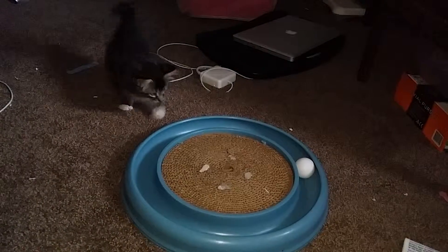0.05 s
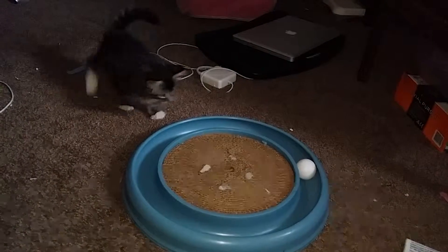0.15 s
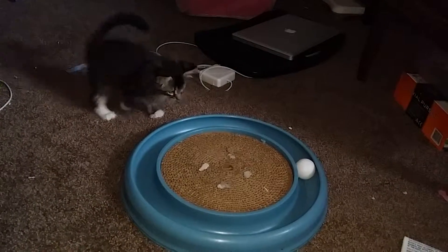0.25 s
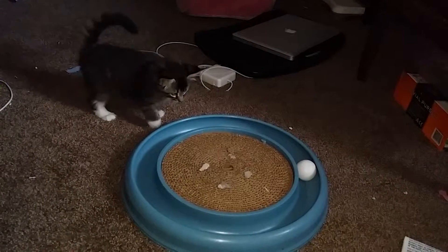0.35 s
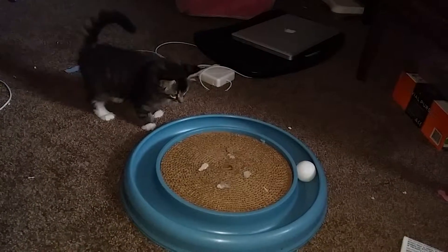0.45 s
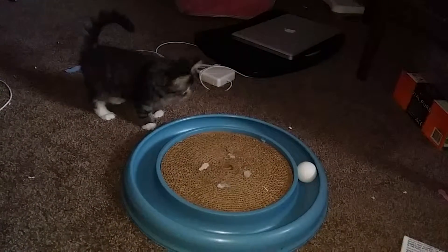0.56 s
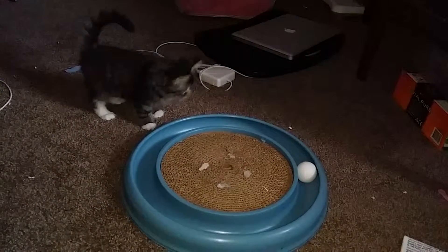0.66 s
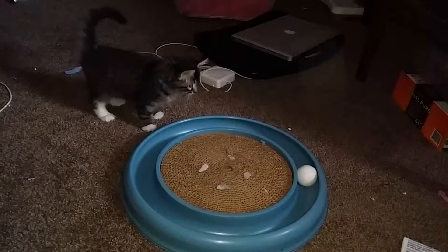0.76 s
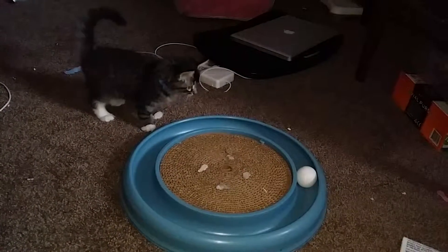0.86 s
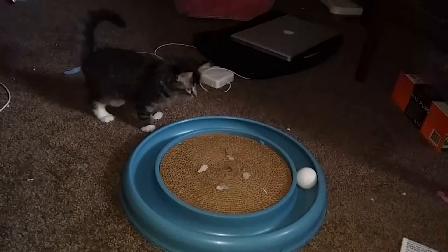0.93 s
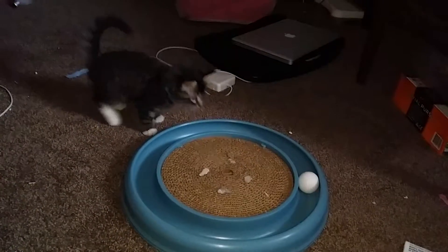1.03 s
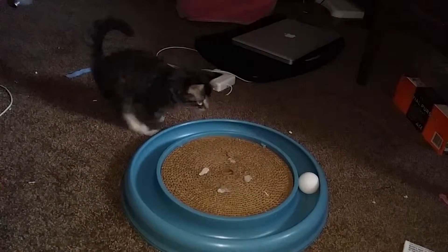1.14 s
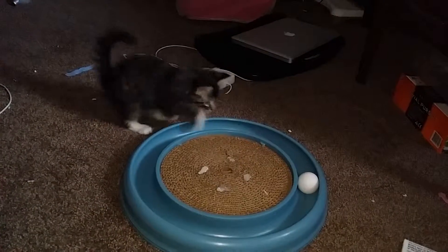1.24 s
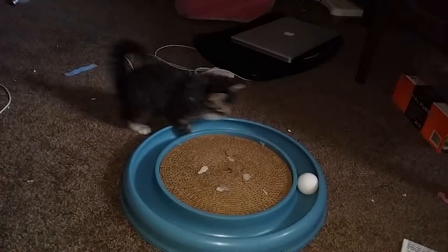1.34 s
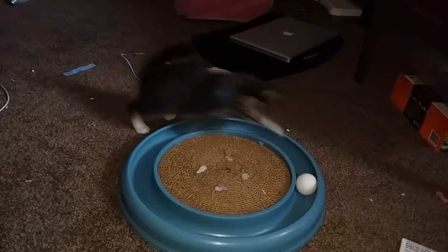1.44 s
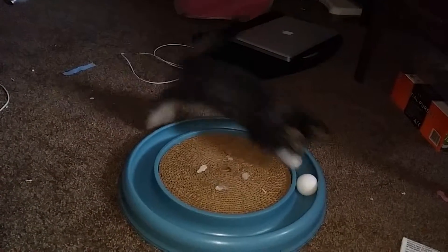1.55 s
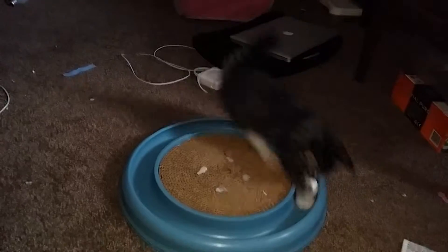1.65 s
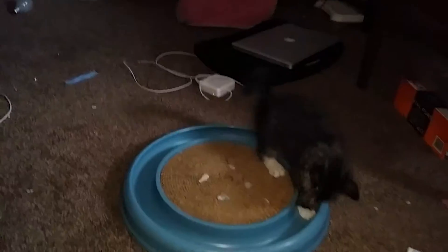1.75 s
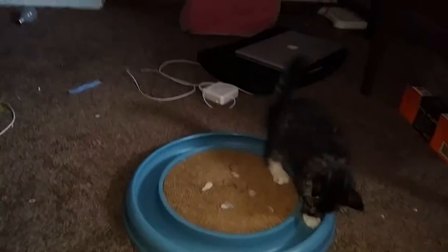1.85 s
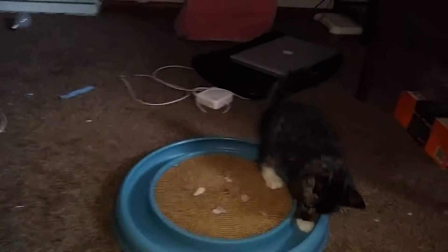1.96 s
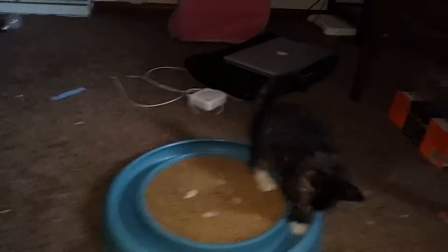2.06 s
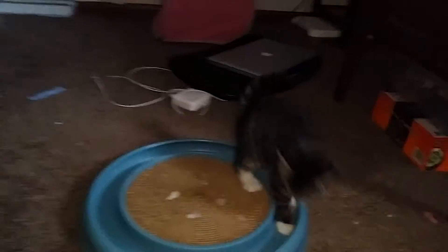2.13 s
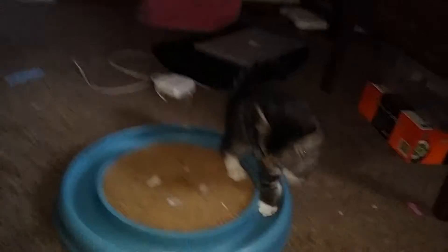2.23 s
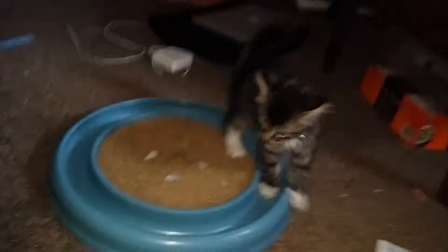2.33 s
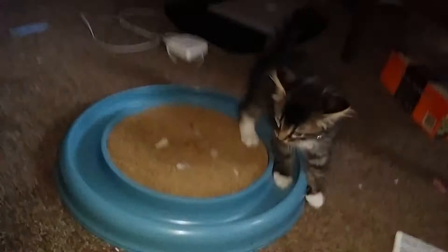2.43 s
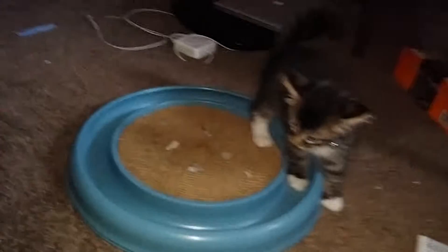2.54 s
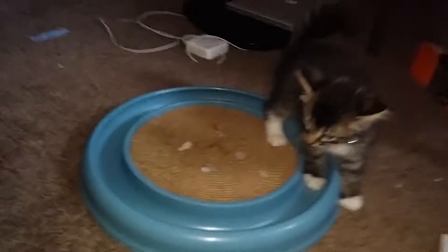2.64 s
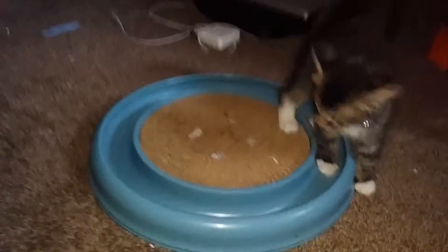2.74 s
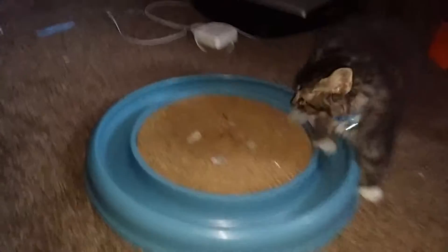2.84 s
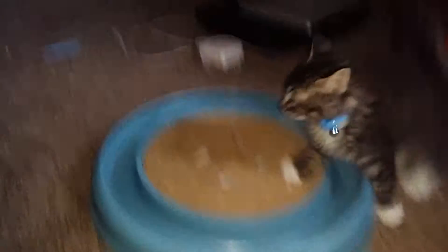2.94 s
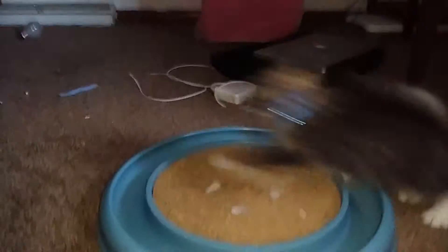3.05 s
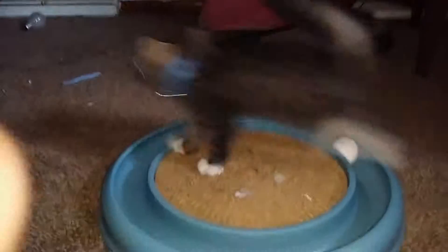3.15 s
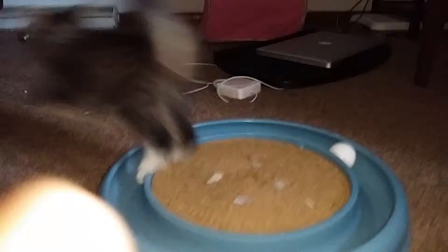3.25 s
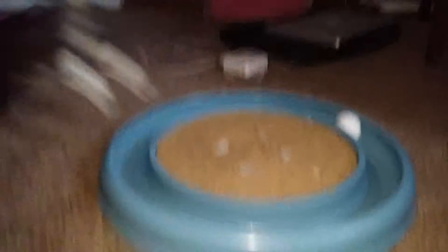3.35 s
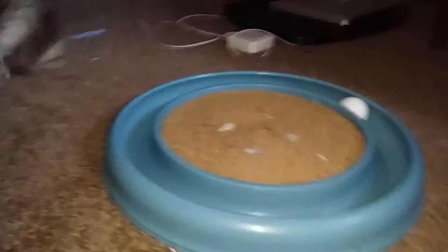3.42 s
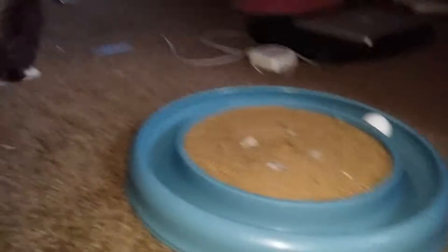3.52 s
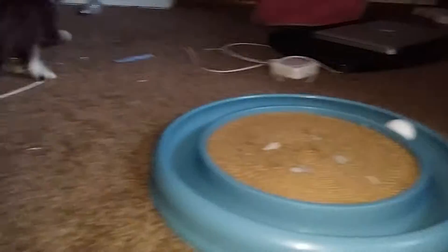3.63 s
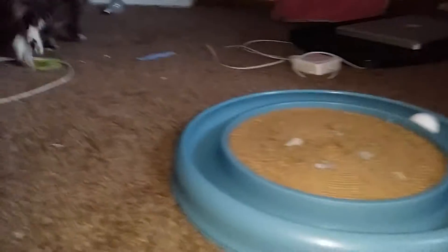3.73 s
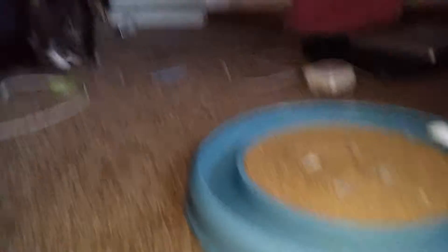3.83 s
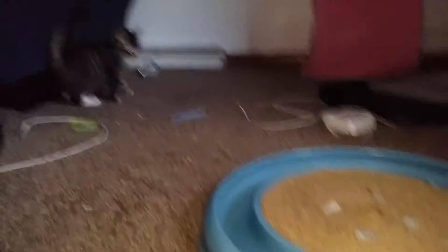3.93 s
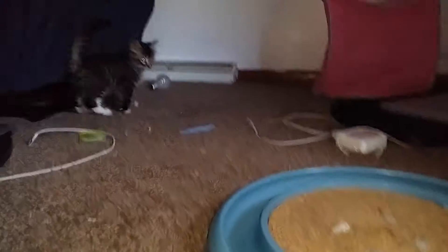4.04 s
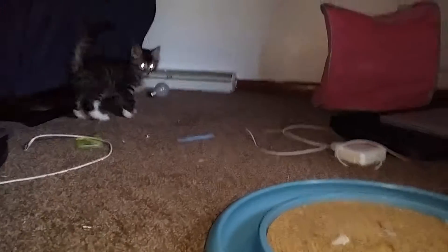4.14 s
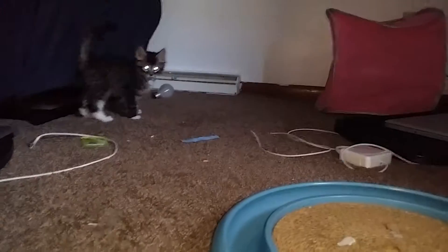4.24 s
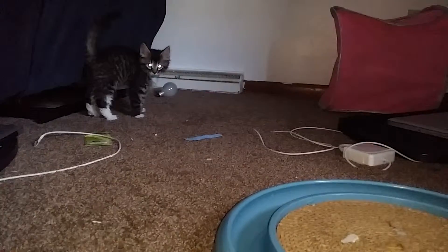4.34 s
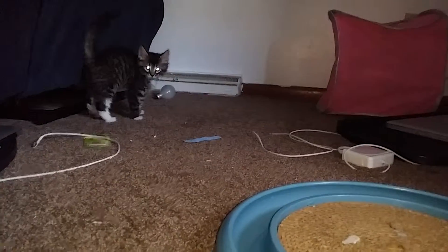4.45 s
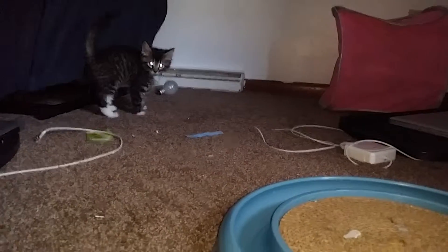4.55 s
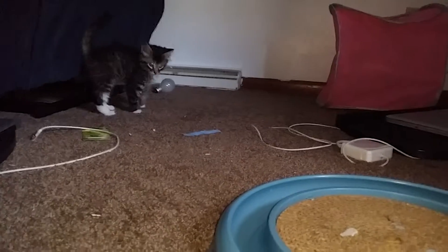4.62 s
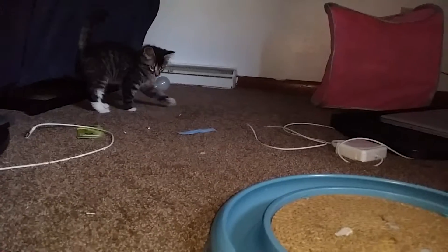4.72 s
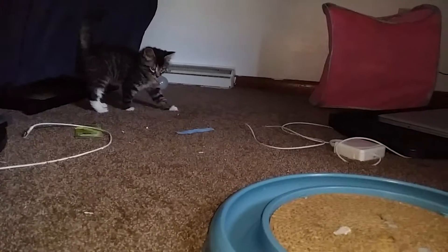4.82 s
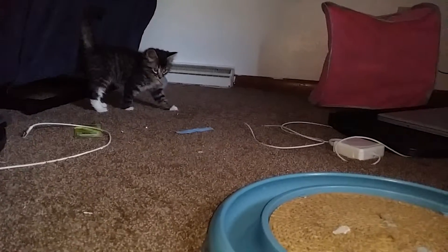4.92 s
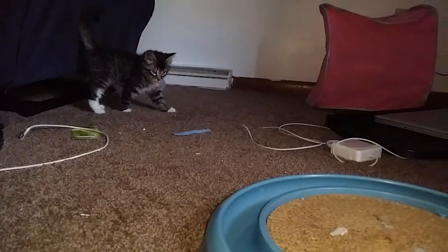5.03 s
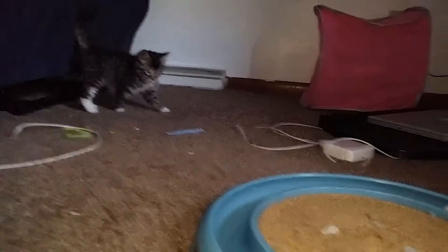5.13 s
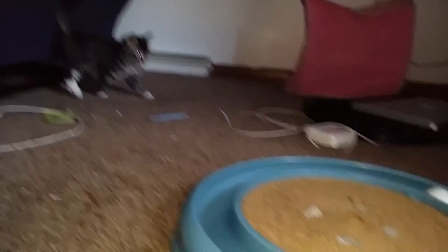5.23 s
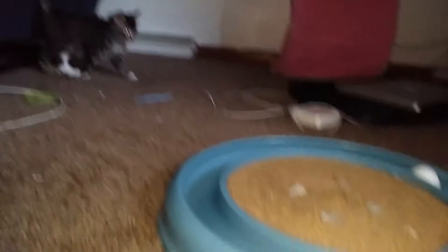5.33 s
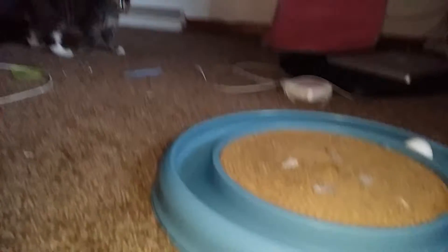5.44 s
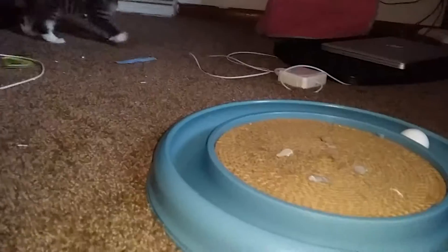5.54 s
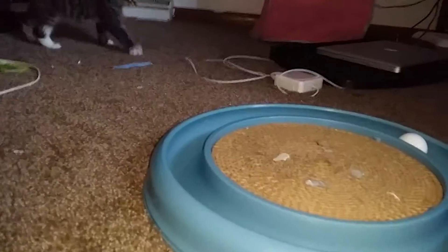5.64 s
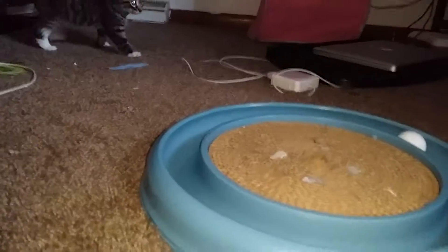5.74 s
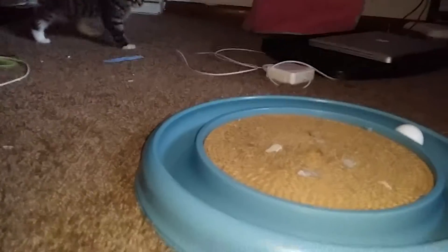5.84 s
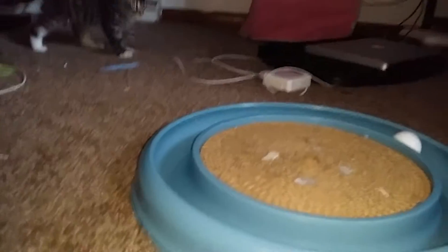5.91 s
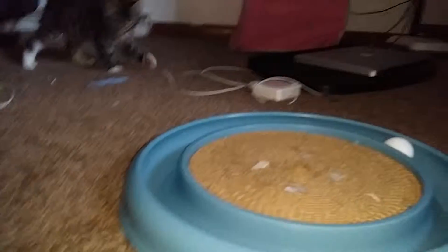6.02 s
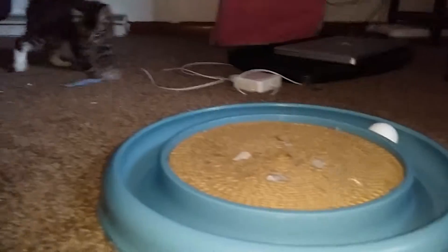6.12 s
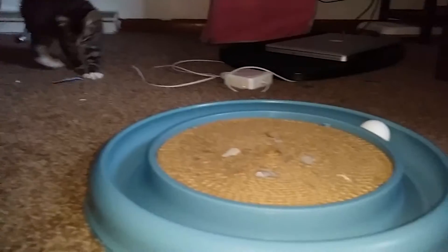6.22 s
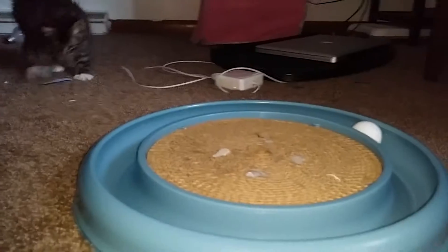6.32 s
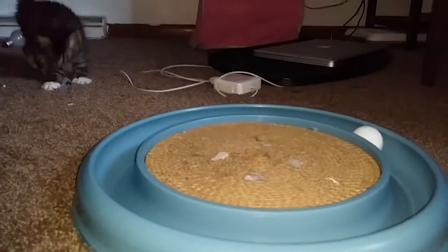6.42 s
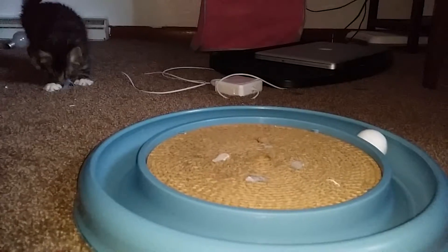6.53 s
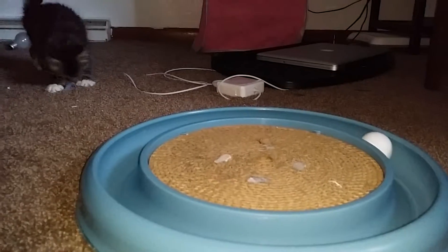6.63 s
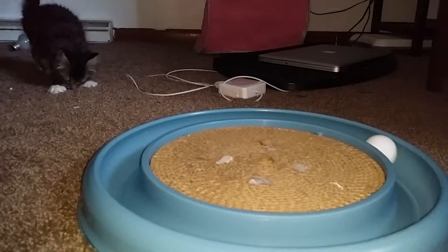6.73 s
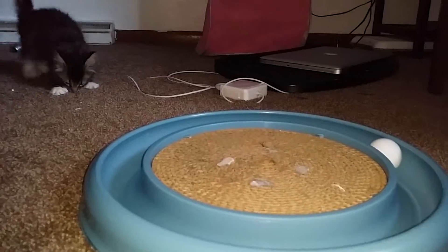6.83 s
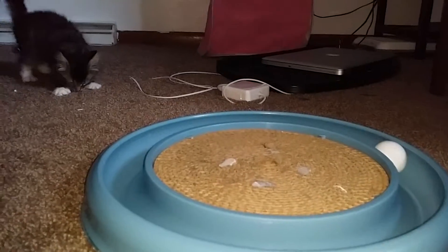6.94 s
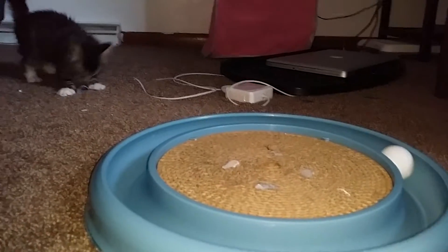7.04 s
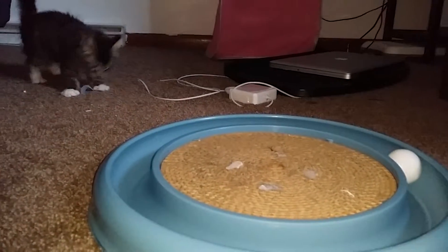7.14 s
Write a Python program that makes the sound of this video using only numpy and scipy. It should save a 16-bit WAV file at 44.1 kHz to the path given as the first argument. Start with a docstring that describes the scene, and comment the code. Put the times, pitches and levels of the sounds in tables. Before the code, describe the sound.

Faint bell tinkles and soft plastic bumps build to a burst of thumps, claw scrapes and bright jingling, then fade amid close handling clicks.

```python
"""Kitten with a collar bell on a ball-track toy

A kitten pounces on a plastic ball-track toy, scrambles over it and runs off across carpet.
Bell: a pellet strikes decaying shell modes. Toy: paw pushes and ball bumps ring plastic modes.
Paws scuff with shaped grain noise; a claw rakes cardboard ridges. The hand-held phone clicks,
creaks, squeaks and thuds through driven resonances and pulses. The room is small and quiet.
"""
import sys
import numpy as np
from scipy import signal
from scipy.fft import rfft, irfft
from scipy.io import wavfile
from scipy.ndimage import uniform_filter1d, map_coordinates

SR = 44100
rng = np.random.default_rng(int(sys.argv[2]) if len(sys.argv) > 2 else 0)


def wrap_up_sound(samples):
    """Save the sound to the file named by the first command line argument, as 16-bit audio."""
    columns = np.atleast_2d(samples).T
    # keep every value between -1 and 1, then stretch to whole-number steps
    tamed = np.clip(columns, -1, 1)
    steps = np.round(tamed * 32767).astype(np.int16)
    wavfile.write(sys.argv[1], SR, steps)


N = 316362
AGE_S = np.arange(SR // 4) / SR  # clock of one short sound


def undb(db):
    """Decibels to amplitude gain."""
    return 10 ** (np.asarray(db) / 20)


def unit_rms(x):
    """Scale to rms 1."""
    return x / np.sqrt(np.mean(x ** 2))


def add(track, start_s, sound, peak_db, pan_db=0):
    """Mix in a sound at a peak level, then balance it; pan_db is left minus right."""
    sides = undb(np.array([[pan_db], [-pan_db]]) / 2)
    start = max(int(start_s * SR), 0)
    gain = undb(peak_db) / np.abs(sound).max()
    placed = (sound * gain * sides / sides.mean())[:, :N - start]
    track[:, start:start + placed.shape[1]] += placed


def band(x, hz, width_hz):
    """One resonance, gain 1 at its centre."""
    return signal.lfilter(*signal.iirpeak(min(hz, .45 * SR), hz / width_hz, SR), x)


def double_band(x, hz, width_hz):
    """The same resonance twice, for steeper skirts."""
    return band(band(x, hz, width_hz), hz, width_hz)


def ring(x, hz, t60_s):
    """One exponentially decaying mode driven by x."""
    pole = np.exp((2j * np.pi * hz - np.log(1000) / t60_s) / SR)
    return signal.lfilter([1], [1, -pole], x).imag


def colour(x, points):
    """Filter x by (hz, level_db) points joined over log frequency; scale to rms 1."""
    hz, level_db = np.transpose(points)
    f = np.maximum(np.fft.rfftfreq(x.shape[-1], 1 / SR), 1)
    gain = undb(np.interp(np.log(f), np.log(hz), level_db))
    return unit_rms(irfft(rfft(x) * gain, x.shape[-1]))


def diffuse(x, alike_hz, unlike=0.21):
    """Make two unrelated signals more alike in the bass, as at two close microphones."""
    highpass = signal.butter(1, alike_hz, "high", fs=SR, output="sos")
    side = unlike * x[1] + (1 - unlike) * signal.sosfilt(highpass, x[1])
    return np.array([x[0] + side, x[0] - side])


def walk(steps_per_s):
    """Smoothed random steps at rms near 1."""
    size = int(SR / steps_per_s)
    steps = np.repeat(rng.standard_normal(N // size + 1), size)
    return unit_rms(uniform_filter1d(steps, size)[:N])


# room tone and microphone hiss spectrum: hz, level_db (per Hz, relative)
QUIET_SPECTRUM = [(25, -29.5), (50, -19.5), (88, 6.5), (130, -2), (360, -4.5), (500, -10.5), (1400, -20.5),
                  (3500, -25.5), (5400, -24.5), (7200, -16.5), (10500, -26.5), (14500, -27.5)]


def quiet(level_db=-65.5, waver_db=-1.5):
    """Room rumble and microphone hiss: coloured noise whose level wavers slowly."""
    noise = diffuse(rng.standard_normal((2, N)), alike_hz=349.6)
    return colour(noise, QUIET_SPECTRUM) * undb(level_db + waver_db * walk(5.8))


def room(x, low_t60_s=0.11, high_t60_s=0.42, gap_s=0.002):
    """Short diffuse reflections of a carpeted room: convolution with decaying noise."""
    noise = diffuse(rng.standard_normal((2, SR // 2)), alike_hz=600)
    t = np.arange(SR // 2) / SR
    low = signal.sosfilt(signal.butter(1, 3000, fs=SR, output="sos"), noise)
    high = 0.26 * (noise - low)
    tail = (low * undb(-60 * t / low_t60_s) + high * undb(-60 * t / high_t60_s)) * (t > gap_s)
    mono = x.mean(axis=0)[None]
    return signal.fftconvolve(mono, tail / np.sqrt(np.sum(tail[0] ** 2)), axes=1)[:, :N]


def stroke(start_s, rise_s, fade_20db_s):
    """Pressure of one stroke: linear build-up, exponential fade."""
    age_s = np.arange(N) / SR - start_s
    fade = undb(-20 * np.maximum(age_s - rise_s, 0) / fade_20db_s)
    return np.clip(age_s / rise_s, 0, 1) * fade


# strokes over carpet and cardboard; the low rub around 3.5-4.1 s and 6.1-6.5 s is a hand rubbing the phone:
# start_s, rise_s, fade_20db_s, rub_db, scratch_db
PAW_STROKES = [(1.653, 0.0024, 0.18, -57, -65), (1.788, 0.0061, 0.39, -57.5, -58),
               (2.28, 0.033, 1.8, -64.5, -65), (2.409, 0.019, 0.03, -54, -58),
               (2.77, 0.048, 1.55, -53.5, -59), (2.96, 0.039, 0.06, -41, -36.5),
               (3.039, 0.015, 0.33, -41, -45.5), (3.353, 0.0076, 0.1937, -42, -42),
               (3.42, 0.049, 0.16, -48, -42.5), (3.482, 0.066, 0.0818, -39, -35),
               (3.6, 0.056, 0.5924, -44.5, -50.5), (3.86, 0.055, 0.43, -51, -61.5),
               (5.3, 0.01, 0.17, -60, -93.5), (5.44, 0.045, 2, -68.5, -82),
               (6.116, 0.012, 0.3347, -46, -82), (6.26, 0.012, 0.0244, -56, -51)]
# rubbed pile spectrum: hz, level_db (per Hz, relative)
RUB_SPECTRUM = [(30, -19.5), (70, 8.5), (400, 4), (1800, -3), (3500, -7), (6500, -20), (10000, -26.5),
                (15000, -51)]
# plucked fibre spectrum: hz, level_db (per Hz, relative)
SCRATCH_SPECTRUM = [(1000, -8), (3000, -1.5), (6800, 5), (9500, -1), (14000, -6), (16000, -22.5)]


def scuffing(grain_db=1.5, flutter_db=2.0):
    """Paws drag through the pile, claws pluck fibres and a hand rubs the phone: dense tiny grains in uneven
    strokes."""
    pressure = np.array([stroke(*row[:3]) for row in PAW_STROKES])
    levels_db = np.transpose(PAW_STROKES)[3:]
    uneven_db = flutter_db * walk(60)
    size = SR // 1500
    out = 0
    for level_db, spectrum in zip(levels_db, (RUB_SPECTRUM, SCRATCH_SPECTRUM)):
        # every fibre lets go with its own force
        force = np.minimum(rng.exponential(size=N // size + 1), 5)
        force = np.repeat(force, size)[:N]
        grains = rng.standard_normal((2, N)) * undb(grain_db * force)
        # overlapping strokes add in power
        strength = np.sqrt(undb(level_db) ** 2 @ pressure ** 2)
        texture = colour(diffuse(grains, alike_hz=806), spectrum)
        out = out + texture * strength * undb(uneven_db)
    return out


# finger bumps beside the right microphone: start_s, peak_db
FINGER_BUMPS = [(5.305, -39), (6.177, -34)]


def bumps(start_hz=190, end_hz=62, sag_s=0.0049, t60_s=0.094):
    """Dull thuds: decaying sines whose pitch sags as the fingertip relaxes."""
    out = np.zeros((2, N))
    hz = end_hz + (start_hz - end_hz) * np.exp(-AGE_S / sag_s)
    thud = np.sin(2 * np.pi * np.cumsum(hz) / SR) * undb(-60 * AGE_S / t60_s)
    for start_s, peak_db in FINGER_BUMPS:
        add(out, start_s, thud, peak_db, pan_db=-33.0)
    return out


# dull low knocks, alone or under clicks, creaks and squeaks: start_s, peak_db, pitch_hz
DULL_KNOCKS = [(1.402, -56.5, 260), (2.928, -24, 845), (2.955, -27.5, 1720), (3.194, -39, 1500),
               (3.205, -28.5, 1300), (4.5838, -27.5, 567), (5.255, -54, 743), (5.737, -50, 620),
               (5.902, -42, 705), (5.9833, -33, 684), (6.118, -29.5, 1300), (6.128, -35.5, 700),
               (6.295, -29.5, 790)]


def dull_knocks(width_per_hz=0.85):
    """A dull knock rings low and briefly: an impulse through a broad double resonance."""
    out = np.zeros((2, N))
    for start_s, peak_db, hz in DULL_KNOCKS:
        knock = double_band(signal.unit_impulse(len(AGE_S)), hz, hz * width_per_hz)
        add(out, start_s, knock, peak_db)
    return out


# falling squeaks of fingers on the case:
# start_s, peak_db, length_s, start_hz, end_hz, hiss_db, pan_db (left minus right)
FINGER_SQUEAKS = [(4.2078, -21.5, 0.0077, 3237, 667, -1.5, 3.5), (4.3967, -23, .012, 872, 480, -12.5, 2.5),
                  (4.5752, -27, 0.0082, 704, 406, -12, 4)]


def squeaks(sag=0.332, rise_s=0.00053, peaky=1.33, hiss_hz=2800, hiss_width_hz=3800, linger=1.3):
    """Skin sticks and slips for a few slowing cycles; slips hiss and a faint rub trails."""
    out = np.zeros((2, N))
    for start_s, peak_db, length_s, start_hz, end_hz, hiss_db, pan_db in FINGER_SQUEAKS:
        hz = end_hz + (start_hz - end_hz) * np.exp(-AGE_S / (sag * length_s))
        slip = np.exp(peaky * (np.sin(2 * np.pi * np.cumsum(hz) / SR) - 1))
        release = np.clip((length_s - AGE_S) / (sag * length_s), 0, 1)
        grip = np.minimum(AGE_S / rise_s, 1) * release
        hiss = unit_rms(band(rng.standard_normal((2, len(AGE_S))), hiss_hz, hiss_width_hz))
        hiss = hiss * np.exp(-AGE_S / (linger * length_s))
        squeak = (slip - slip.mean()) * grip + undb(hiss_db) * slip * hiss
        add(out, start_s, squeak, peak_db, pan_db)
    return out


def case(slips, panel_hz, panel_width_hz, port_db, edge_db):
    """Slips in the plastic ring a panel and the microphone's port, with a thin bright edge."""
    port_hz, port_width_hz = 6680, 1100
    panel = band(band(slips, panel_hz, panel_width_hz), panel_hz, width_hz=3000)
    port = band(band(slips, port_hz, port_width_hz), port_hz, width_hz=1300)
    edge = band(band(slips, hz=11800, width_hz=2100), hz=12300, width_hz=2400)
    parts = zip((panel, port, edge), (0, port_db, edge_db))
    return sum(undb(db) * x / np.abs(x).max() for x, db in parts)


# creaks of the case under the grip: start_s, peak_db, length_s, mean_slips_per_s,
# panel_hz, panel_width_hz, port_db, edge_db (both re panel), pan_db (left minus right)
CASE_CREAKS = [(3.1995, -22.5, 0.0059, 440, 1520, 2594, -31, -29, 13),
               (5.821, -22.5, 0.013, 322, 1378, 903, 12, -14.5, 9),
               (5.924, -29, 0.0034, 570, 1180, 1996, -26.5, -27, 6.5),
               (5.9686, -24, .016, 127, 3630, 855, -11, -18, 11.5),
               (6.126, -21.5, 0.0071, 530, 3500, 930, -19, -11, 9),
               (6.279, -27, 0.0027, 710, 3530, 790, -18, -11, 6.5),
               (6.2906, -16, 0.0075, 160, 3280, 977, -19, -12, 9.5)]


def creaks(slowing=0.27, fade_db=-2, rub_db=-22, uneven_db=3, slip_s=0.00043, linger=1.8):
    """Uneven stick-slip slows and fades; each slip is a tiny scrape, with a grainy rub trailing."""
    out = np.zeros((2, N))
    for start_s, peak_db, length_s, slips_per_s, *panel, port_db, edge_db, pan_db in CASE_CREAKS:
        progress = np.minimum(AGE_S / length_s, 1)
        cycles = slips_per_s * length_s * (progress + slowing * progress * (1 - progress))
        slip_db = fade_db * progress + uneven_db * rng.standard_normal(len(AGE_S))
        slips = np.diff(np.floor(cycles), prepend=-1) * undb(slip_db)
        scrapes = signal.lfilter([1], [1, -np.exp(-1 / (slip_s * SR))], slips)
        sliding = scrapes + undb(rub_db) * np.exp(-AGE_S / (linger * length_s))
        noise = sliding * rng.standard_normal((2, len(AGE_S)))
        add(out, start_s, case(noise, *panel, port_db, edge_db), peak_db, pan_db)
    return out


# snaps of the phone's case: start_s, peak_db, panel_hz,
# port_db, edge_db (both re panel), pan_db (left minus right)
CASE_SNAPS = [(0.285, -51.5, 2960, 6, 7, 6), (2.311, -40.5, 1140, -12, -18, 0),
              (2.886, -27.5, 1874, -16, -27, 37), (2.929, -9, 2000, -8, -19, 46.5),
              (2.977, -25, 1380, -2, 0.5, 32), (3.0164, -16, 3212, 11, -7, 27.5),
              (3.045, -20.5, 2690, -8, -20.5, 44), (3.9353, -8, 4210, 5.5, -2, 38.5),
              (3.9368, -14, 2465, -13.5, -14, -25), (6.119, -7.5, 2423, 9.5, -4, 32)]


def snaps(panel_width_hz=750):
    """Single dry clicks at the microphones: an impulse and a noise burst ring the case."""
    out = np.zeros((2, N))
    slip = rng.standard_normal(len(AGE_S)) * np.exp(-AGE_S / 0.00028) * 0.029
    slip[0] = 1
    for start_s, peak_db, panel_hz, port_db, edge_db, pan_db in CASE_SNAPS:
        click = case(slip, panel_hz, panel_width_hz, port_db, edge_db)
        add(out, start_s, click, peak_db, pan_db)
    return out


def rake(count=26, start_hz=2100, end_hz=950, width_per_hz=.25, fade_db=-6):
    """A claw catches cardboard ridges at an even pace; each rings briefly, tending lower and softer as the rake
    goes on."""
    start_s, length_s, loudest_db = 3.055, .085, -25.5
    out = np.zeros((2, N))
    for k, (late, softer, tone, side) in enumerate(rng.random((count, 4))):
        progress = (k + late) / count
        hz = start_hz * (end_hz / start_hz) ** progress * 2 ** (tone - .5)
        ridge = band(band(signal.unit_impulse(len(AGE_S)), hz, hz * width_per_hz), hz, hz)
        ridge_db = loudest_db + fade_db * progress - 10 * softer
        add(out, start_s + progress * length_s, ridge, ridge_db, 10 * (side - .5))
    return out


# ball bumping to and fro in its track under a paw: start_s, peak_db
BALL_BUMPS = [(2.298, -46.5), (2.359, -48.5), (2.386, -43.5), (2.444, -42), (2.515, -38.5), (2.563, -42),
              (2.610, -50), (2.655, -42.5), (2.692, -49), (2.746, -47), (2.838, -38.5)]
# modes of the hollow plastic ring, undamped and before scatter: hz, level_db, t60_s
TOY_MODES = [(225, -6, 0.053), (281.6, -7, 0.29), (375.2, -0.5, 0.18), (462, -11, 0.17), (585, -8, 0.05),
             (739, -4.5, 0.074)]


def ball(push_hz=370, push_width_hz=260, grain_db=-26, grain_s=.02, thud_hz=240, thud_db=-2):
    """Each soft bump of the ball is a dull thud and a short gritty roll that ring the track."""
    out = np.zeros((2, N))
    for start_s, peak_db in BALL_BUMPS:
        grit = rng.standard_normal(len(AGE_S)) * np.exp(-AGE_S / grain_s)
        roll = signal.unit_impulse(len(AGE_S)) + undb(grain_db) * grit
        push = band(roll, push_hz, push_width_hz)
        # the paw damps the track: half the ring time
        track = sum(undb(db) * ring(push, hz, t60_s / 2) for hz, db, t60_s in TOY_MODES)
        thud = unit_rms(band(push, thud_hz, thud_hz / 2))
        add(out, start_s, unit_rms(track) + undb(thud_db) * thud, peak_db)
    return out


# paws landing on the toy and the floor beside it: start_s, peak_db, push_hz
PAW_KNOCKS = [(1.658, -37.5, 392), (1.795, -31.5, 231), (1.894, -37.5, 398), (1.93, -40.5, 294),
              (2.793, -39.5, 312), (3.067, -20, 377), (3.237, -29, 274), (3.277, -26, 287),
              (3.366, -14.5, 350), (3.562, -28, 177), (3.665, -37.5, 167)]
# spectrum of the toy's loose parts: hz, level_db (per Hz, relative)
CHATTER_SPECTRUM = [(150, -22.5), (600, 8), (1500, -12), (4000, -25), (10000, -37.5)]


def toy(push_s=0.0014, shell_db=-12, grit_db=-22, grit_s=0.041):
    """A soft push thumps the hollow ring and sets its modes going; loose parts chatter briefly."""
    out = np.zeros((2, N))
    for start_s, peak_db, push_hz in PAW_KNOCKS:
        age = AGE_S / push_s
        push = np.sin(2 * np.pi * push_hz * AGE_S) * (age / 2) ** 2 * np.exp(2 - age)
        shell = 0
        for hz, mode_db, t60_s in TOY_MODES:
            decay = undb(mode_db + 2 * rng.standard_normal() - 60 * AGE_S / t60_s)
            cycles = hz * rng.normal(1, 0.0071) * AGE_S + rng.random()
            shell = shell + decay * np.sin(2 * np.pi * cycles)
        noise = diffuse(rng.standard_normal((2, len(AGE_S))), alike_hz=1200)
        grit = colour(noise, CHATTER_SPECTRUM) * np.exp(-AGE_S / grit_s)
        response = undb(shell_db) * shell + undb(grit_db) * grit
        add(out, start_s, push + response * (1 - np.exp(-age ** 2)), peak_db, pan_db=-1.5)
    return out


# kitten moves that swing the collar bell:
# start_s, peak_db, swing_s (out to back), pan_db (left minus right)
BELL_SHAKES = [(0.024, -41.5, 0.077, -2), (0.6, -51.5, .027, 5), (0.762, -52, 0.05, -3),
               (1.242, -61, 0.014, 9), (1.553, -46, 0.01, 9), (1.5755, -32.5, 0.011, 3),
               (1.653, -30, 0.044, 7), (1.728, -35, 0.017, 6.5), (1.8664, -44, 0.018, 9),
               (1.943, -36.5, 0.057, 7), (2.104, -46, 0.022, 6.5), (2.2842, -42, 0.017, 3),
               (2.3413, -40, .014, 0), (2.423, -29.5, 0.0093, -2), (2.5107, -25.5, 0.025, -0.5),
               (2.683, -44.5, 0.0057, 8), (3.049, -24.5, 0.0062, 7), (3.0815, -18, 0.0077, -8.5),
               (3.1355, -20.5, 0.036, -10), (3.1815, -13, 0.016, -5), (3.2119, -23, 0.017, -5),
               (3.2792, -9.5, .007, -5.5), (3.2873, -11.5, 0.011, -5), (3.3031, -12, .0205, -7.5),
               (3.3344, -16, 0.0095, -5), (3.3439, -9, 0.002, -9), (3.3915, -13.5, .014, -11),
               (3.4551, -19.5, 0.0088, -4), (3.5296, -18.5, 0.006, -15), (3.5391, -15, 0.021, -16),
               (3.575, -18.5, 0.011, -19), (3.644, -23, .012, -23), (3.8066, -18, .014, -7),
               (4.067, -29, 0.017, 1), (4.167, -34, .02, 3), (4.188, -36, 0.00745, 1),
               (4.289, -33.5, 0.013, 5), (4.349, -42, .005, 3), (4.503, -45, 0.05, -2),
               (4.7755, -50, 0.03, 4), (4.826, -35.5, 0.02, -0.5), (4.943, -49, 0.025, 3.5),
               (5.153, -63, 0.0101, 4.5), (5.5827, -42, 0.027, 0), (5.646, -42, 0.012, -4),
               (6.158, -37, 0.014, 4), (6.2582, -25, 0.0022, -1), (6.327, -30, 0.066, 1),
               (6.4803, -37.5, 0.046, -7.5), (6.708, -46, 0.014, 1.5), (6.811, -51.5, 0.021, -3),
               (6.8553, -40.5, 0.021, -1)]


def throws(swing_loss_db=3, turn_db=3):
    """Each move throws the pellet twice: swing out, then softer on the swing back."""
    for start_s, peak_db, swing_s, pan_db in BELL_SHAKES:
        yield start_s, peak_db, pan_db
        # balance scatters as the shell turns
        back_pan_db = pan_db + turn_db * rng.standard_normal()
        yield start_s + swing_s, peak_db - swing_loss_db, back_pan_db


# modes of the slit bell shell: hz, level_db, longest_t60_s
BELL_MODES = [(5379, 8.5, 0.07), (5444, 5.5, 0.074), (5576, 3.5, 0.035), (5810, 1.5, 0.035),
              (5960, 3.5, 0.029), (6350, 7.5, 0.005), (12900, -11.5, 0.074), (12910, -10, 0.056)]
# level of the two highest modes over time, brightest around 3.13 to 3.17 s: time_s, level_db
BELL_TOP_LEVEL = [(3.09, 2), (3.13, 17.5), (3.172, 20), (3.18, -0.5), (3.53, 1), (3.6, -11)]


def bell(hits_per_s=210, settle_s=0.028, run_up_at_0db_s=0.00064, lazy=0.76, apart=0.6,
         flutter=0.007, contact_width_at_0db_hz=3800, softening=0.19, choke_s=0.04,
         rattle_at_0db_db=-6, rattle_slope=0.15):
    """Each shake rolls and throws a pellet; it rattles on, ever softer, striking modes unevenly."""
    out = np.zeros((2, N))
    lead = SR // 50
    t = AGE_S[:len(AGE_S) // 2] - AGE_S[lead]
    # so small a shell radiates little below its lowest mode
    radiation = signal.butter(8, 5100, "high", fs=SR, output="sos")
    for start_s, peak_db, pan_db in throws():
        # gentle shakes swell in, hard ones strike at once
        rolling_s = run_up_at_0db_s * undb(-lazy * peak_db)
        envelope = np.exp(-np.maximum(t / settle_s, -t / rolling_s))
        # a hard throw stands clear of the rattle after it
        rattle = min(undb(rattle_at_0db_db - rattle_slope * peak_db), 1)
        strikes = (rng.random(len(t)) < hits_per_s / SR) * rng.uniform(-1, 1, len(t))
        hits = rattle * strikes * envelope
        hits[lead] = 1  # the throw itself is the hardest blow
        # gentle shakes make a softer contact
        width_hz = contact_width_at_0db_hz * undb(softening * peak_db)
        top_db = np.interp(start_s, *np.transpose(BELL_TOP_LEVEL))
        shell = 0
        for hz, mode_db, t60_s in BELL_MODES:
            # the turning shell sends each mode differently to the two microphones
            push = hits * (1 + apart * rng.standard_normal((2, len(t))))
            push = double_band(push, hz, width_hz)
            gain = undb(mode_db + top_db * (hz > SR / 4))
            # fur and collar damp the shell anew at each throw
            shell = shell + gain * ring(push, hz, t60_s * rng.uniform(.5, 1))
        # the rolling pellet loads the shell, so pitch flutters; at rest it chokes the ring
        wander = unit_rms(uniform_filter1d(rng.standard_normal(len(t)), lead // 4))
        clock = np.cumsum(1 + flutter * wander)
        shell = np.array([map_coordinates(side, [clock]) for side in shell])
        shell = shell * np.exp(-(t / choke_s) ** 2)
        # the left microphone hears it a few samples later
        shell[0] = np.roll(shell[0], rng.integers(4, 14))
        add(out, start_s + t[0], signal.sosfilt(radiation, shell), peak_db, pan_db)
    return out


def scene():
    """Kitten and toy sound in the room; the sharp clicks of the phone reach it only weakly."""
    jingle = bell()
    thumps = toy() + ball() + rake()
    creaking = creaks()
    squeaks_and_knocks = squeaks() + dull_knocks()
    clicks = snaps()
    sent = undb(-6) * jingle + undb(-10.0) * thumps + undb(-7.0) * creaking
    sent = sent + undb(-10.5) * squeaks_and_knocks + undb(-21.5) * clicks
    direct = jingle + thumps + creaking + squeaks_and_knocks + clicks + bumps() + scuffing()
    return direct + room(sent) + quiet()


def record(dry, bass_hz=40, top_hz=15000):
    """The phone thins the deepest bass and cuts the top."""
    thinned = signal.sosfilt(signal.butter(2, bass_hz, "high", fs=SR, output="sos"), dry)
    return signal.sosfilt(signal.ellip(8, .2, 70, top_hz, fs=SR, output="sos"), thinned)


dry = scene()
out = record(dry)
wrap_up_sound(out)
```